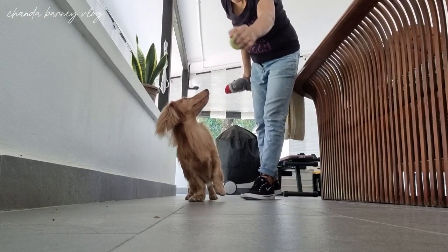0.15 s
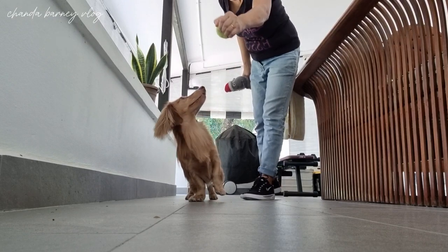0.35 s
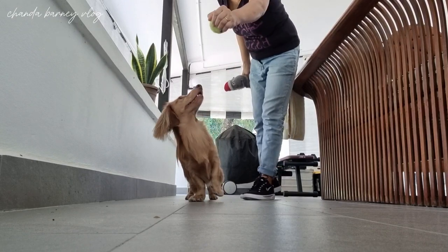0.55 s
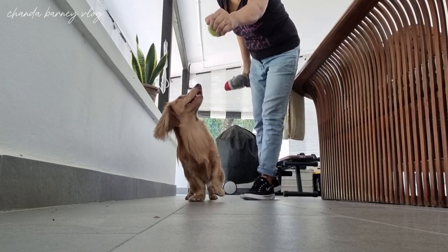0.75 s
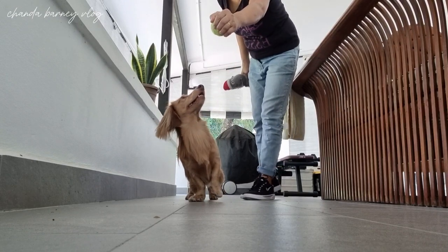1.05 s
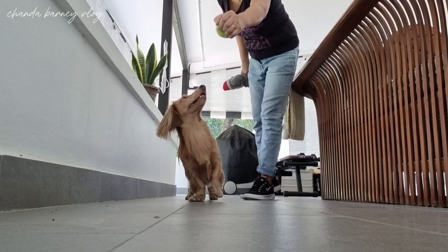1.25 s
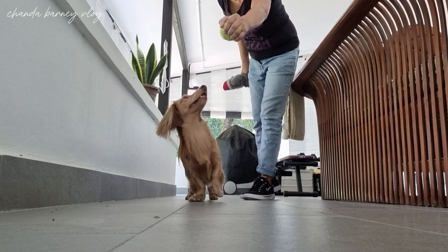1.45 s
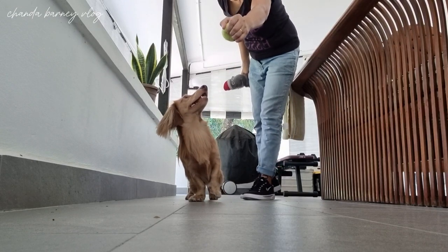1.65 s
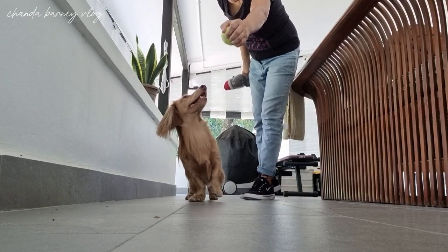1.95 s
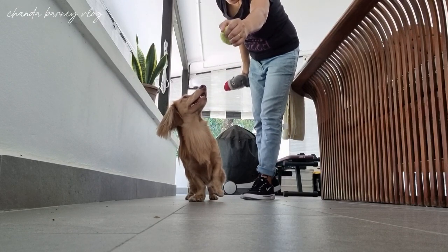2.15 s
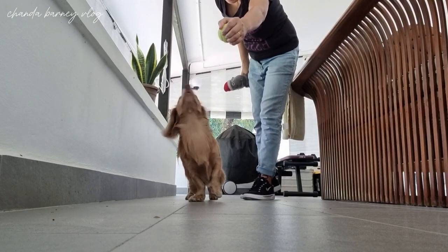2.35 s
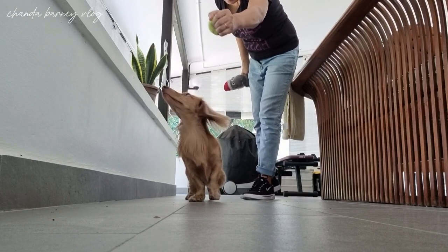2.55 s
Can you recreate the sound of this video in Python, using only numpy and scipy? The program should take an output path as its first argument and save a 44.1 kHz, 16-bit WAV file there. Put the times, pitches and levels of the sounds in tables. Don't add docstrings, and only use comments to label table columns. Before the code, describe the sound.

A squeaky rubber ball gives six short, bright, reedy squeaks at about 0.2, 0.65, 1.05, 1.45, 1.95 and 2.4 seconds. Each starts as a thin falling whistle, locks into a nasal buzz, bends up and drops; the first bends highest, the fourth is nearly flat. Faint air hisses back between squeezes, clearest near 1.75. Hard porch walls ring briefly over very quiet traffic rumble and motor hum.

```python
import sys
import numpy as np
from scipy import signal
from scipy.fft import rfft, irfft
from scipy.io import wavfile
from scipy.ndimage import uniform_filter1d, map_coordinates

SR = 44100
rng = np.random.default_rng(int(sys.argv[2]) if len(sys.argv) > 2 else 0)


def dump_mix(stems):
    frames = np.atleast_2d(stems).T
    limited = np.clip(frames, -1, 1)
    pcm = np.round(limited * 32767).astype(np.int16)
    wavfile.write(sys.argv[1], SR, pcm)


def convert_level_to_amplitude(level_db):
    exponent = np.asarray(level_db, float) / 20
    return 10 ** exponent


N = 119070
BIN_HZ = np.arange(N // 2 + 1) * SR / N


def shape(points, hz):
    p = np.array(points)
    return np.interp(np.log(np.maximum(hz, 1)), np.log(p[:, 0]), p[:, 1])


def resonance(f, hz, width_hz):
    return 1 / (1 + (2 * (f - hz) / width_hz) ** 2)


def noise(gain):
    x = irfft(rfft(rng.standard_normal(N)) * gain(BIN_HZ), N)
    return x / x.std()


def walk(rate_hz):
    return noise(lambda f: 1 / (1 + (f / rate_hz) ** 4))


# t/s, f/Hz
REED_PITCH = [
    [(.235, 1402), (.261, 1485), (.269, 1555), (.283, 1879), (.289, 1924), (.297, 1752), (.303, 1469),
     (.313, 1414), (.321, 1350)],
    [(.649, 1412), (.664, 1478), (.678, 1534), (.686, 1548), (.698, 1460), (.71, 1372), (.722, 1290)],
    [(1.0672, 1410), (1.085, 1450), (1.1, 1475), (1.115, 1445), (1.125, 1385), (1.136, 1290)],
    [(1.472, 1407), (1.496, 1433), (1.514, 1412), (1.522, 1375), (1.535, 1290)],
    [(1.958, 1406), (1.974, 1451), (1.99, 1540), (2.0, 1605), (2.012, 1455), (2.024, 1390), (2.036, 1320)],
    [(2.39, 1409), (2.405, 1468), (2.42, 1511), (2.43, 1455), (2.44, 1368), (2.455, 1290)],
]
REED_LEVEL_DB = [
    [-37.5, -34, -29.5, -30, -30, -32, -42, -36, -44.5],
    [-37, -37.5, -31.5, -32.5, -41, -35, -70],
    [-37.5, -38, -34.5, -36.5, -35.5, -55.5],
    [-37.5, -38.5, -35, -38.5, -54],
    [-37, -37.5, -31, -30, -39.5, -36, -51],
    [-36, -38, -33, -35.5, -36.5, -59],
]
# L-R level/dB, its slope/(dB/octave), treble tilt/(dB/octave),
# partial 1 level/dB, partial 2 level/dB
GRIP = [(2.1, -1.5, .1, 1.1, -0.8), (1.2, -1.5, -0.95, -3.3, -1.9), (0.93, 1.7, -1.27, -1.5, -3.5),
        (-3, 0.5, 0.83, 2, -2), (6.5, -1.7, 0.39, 0, -0.8), (3.5, -1.4, -0.22, -1, -1.8)]
# t re lock/s, f/Hz, level re lock/dB, overtone share/(0-1)
WHISTLE = [
    (-.024, 2800, -46, .01),
    (-.011, 2950, -27, .01),
    (-.007, 2650, -13, .02),
    (-.0055, 2400, -11, .1),
    (-.0045, 2020, 1.5, .5),
    (-.0015, 1780, 1.5, .55),
]
WHISTLE_DB = [9, -1.5, -3, -3, -1.5, -6]
FINGERS_DB = [-2.5, 2, 2.5, -2, -1.4, 0]
BEND_DB = [3, 13, -4.5]
# f/Hz, level/dB
TUBE = [(1300, -6), (3100, 4.3), (4400, 1), (6000, -3), (8200, -20), (10000, -11.5), (11500, -0.5),
        (16000, -10.5)]
REST_HZ, BEND_TILT_DB = 1504, 1.5
LEFT_LAG_S = -.00027
JITTER, SHIMMER_DB = .001, .5
BREATH_DB = -34
PUFF_DB, PUFF_RISE_S, PUFF_FALL_S = -19, .008, .0032


def squeaks():
    out, feed = np.zeros((2, N)), np.zeros(N)
    jitter, shimmer_db = 1 + JITTER * walk(250), SHIMMER_DB * walk(220)
    air = noise(lambda f: convert_level_to_amplitude(0.35 * shape(TUBE, f)) * (f > 1100))
    k = np.arange(1, 13)[:, None]
    start_s, start_hz, start_db, start_share = np.array(WHISTLE).T
    squeezes = zip(REED_PITCH, REED_LEVEL_DB, GRIP, WHISTLE_DB, FINGERS_DB)
    for pitch, level_db, grip, whistle_db, fingers_db in squeezes:
        pan_db, pan_slope_db, tilt_db, first_db, second_db = grip
        reed_s, reed_hz = np.array(pitch).T
        lock_s, lock_db = reed_s[0], level_db[0]
        at = np.r_[lock_s + start_s, reed_s]
        i = np.arange(int(at[0] * SR), int(at[-1] * SR))
        t = i / SR

        hz = np.interp(t, at, np.r_[start_hz, reed_hz])
        hz = uniform_filter1d(hz, size=24) * jitter[i]
        lead_db = lock_db + start_db + whistle_db * (start_share < .015)
        db = np.interp(t, at, np.r_[lead_db, level_db]) + shimmer_db[i]
        share = np.interp(t, at[:len(start_s) + 1], np.r_[start_share, 1])
        share = np.clip(share, 0, 1) ** np.minimum(k - 1, 4)

        octave = np.log2(k * hz / 4000)
        bend = np.log2(hz / REST_HZ) * (t > lock_s)
        tilt = tilt_db + BEND_TILT_DB * bend
        low_db = first_db * (k == 1) + second_db * (k == 2)
        gain = convert_level_to_amplitude(db + shape(TUBE, k * hz) + tilt * octave + low_db)
        gain[:3] *= convert_level_to_amplitude(np.outer(BEND_DB, bend))
        gain[3:5] *= convert_level_to_amplitude(fingers_db)
        phase = k * 2 * np.pi * np.cumsum(hz) / SR + np.pi * k ** 2 / 7
        parts = gain * share * (k * hz < 17000) * np.cos(phase)

        late = t - lock_s
        puff = convert_level_to_amplitude(lock_db + PUFF_DB) * np.exp(np.where(late < 0, late / PUFF_RISE_S, -late / PUFF_FALL_S))
        breath = (convert_level_to_amplitude(db + BREATH_DB) + puff) * air[i]
        feed[i] += parts.sum(0) + breath
        for c, side in enumerate((1, -1)):
            pan = convert_level_to_amplitude(side * (pan_db + pan_slope_db * octave) / 2)
            x = np.pad((parts * pan).sum(0) + breath, 40)
            j = np.arange(len(x))
            delayed = map_coordinates(x, [j - side * LEFT_LAG_S / 2 * SR], order=5)
            out[c, j + i[0] - 40] += delayed
    return out, feed


# t/s, length/s, hiss level/dB, whistle level/dB
REFILLS = [
    (.003, .13, -72, -72),
    (.5, .1, -95, -80),
    (0.901, 0.13, -92, -97),
    (1.33, 0.24, -88, -93),
    (1.718, 0.1, -72, -104.5),
    (2.208, .1, -87, -107),
    (2.62, .1, -95, -92),
]
REFILL_HZ, REFILL_WIDTH_HZ = 4100, 90


def refills():
    t, out = np.arange(N) / SR, np.zeros(N)
    hiss = noise(lambda f: convert_level_to_amplitude(.5 * shape(TUBE, f)) * (f > 1500))
    whistle = noise(lambda f: resonance(f, REFILL_HZ, REFILL_WIDTH_HZ))
    for start_s, length_s, hiss_db, whistle_db in REFILLS:
        flow = np.sin(np.pi * np.clip((t - start_s) / length_s, 0, 1)) ** 2
        out += flow * (convert_level_to_amplitude(hiss_db) * hiss + convert_level_to_amplitude(whistle_db) * whistle)
    return out


# left delay/ms, right delay/ms, level/dB
ECHOES = [
    (.6, .45, -5),
    (2.9, 4.1, -11),
    (6.3, 5.2, -14),
    (27.7, 31.2, -12),
]
# f/Hz, t60/s
LATE_T60 = [
    (1400, 0.66),
    (3000, 0.62),
    (6000, 0.67),
    (12000, 0.41),
]
EARLY_DB, EARLY_T60_S, LATE_DB, GAP_S = -7, 0.23, -12, 0.015
WALL_HZ = 7300


def porch(feed):
    t, out = np.arange(SR) / SR, []
    for c in range(2):
        late = 0
        for hz, t60_s in LATE_T60:
            band = noise(lambda f: np.exp(-np.log2(np.maximum(f, 1) / hz) ** 2 / 0.73))[:SR]
            late = late + band * np.sqrt(hz) * convert_level_to_amplitude(-60 * t / t60_s)
        early = noise(lambda f: (f > 900) / np.sqrt(1 + (f / WALL_HZ) ** 2))[:SR]
        early = early * convert_level_to_amplitude(-60 * t / EARLY_T60_S)
        h = convert_level_to_amplitude(LATE_DB) * late / np.linalg.norm(late) + convert_level_to_amplitude(EARLY_DB) * early / np.linalg.norm(early)
        h *= np.clip(t / GAP_S, 0, 1) ** 2
        for *delay_ms, db in ECHOES:
            h[:2048] += convert_level_to_amplitude(db) * np.sinc(np.arange(2048) - delay_ms[c] * SR / 1000)
        out.append(signal.fftconvolve(feed, h)[:N])
    return np.array(out)


# f/Hz, level/dB
TOWN = [(25, -7.5), (60, -2.5), (161, -9.5), (450, -15), (753, -19), (1600, -33.5), (3000, -39),
        (16000, -50)]
# f/Hz, width/Hz, level/dB
HUM = [
    (72.5, 24, -65),
    (119.9, 10, -64),
    (153.56, 3.1, -63),
    (196.7, 2.7, -73.5),
]
TOWN_DB, ALIKE_HZ = -60, 450


def town():
    mid = noise(lambda f: convert_level_to_amplitude(shape(TOWN, f)))
    side = noise(lambda f: convert_level_to_amplitude(shape(TOWN, f)))
    side_power = 0.073 + 0.77 / (1 + (ALIKE_HZ / np.maximum(BIN_HZ, 1)) ** 2)
    side = irfft(rfft(side) * np.sqrt(side_power), N)
    hum = sum(convert_level_to_amplitude(db) * noise(lambda f: resonance(f, hz, width_hz)) for hz, width_hz, db in HUM)
    sign = np.array([[1], [-1]])
    swell = convert_level_to_amplitude(TOWN_DB + 0.2 * walk(4.5))
    return swell * (mid + sign * side) * convert_level_to_amplitude(0.44 * sign) + hum * convert_level_to_amplitude(0.78 * sign)


def scene():
    direct, feed = squeaks()
    air = refills()
    return direct + air + porch(feed + air) + town()


def band_limit(x):
    return signal.sosfilt(signal.butter(12, 16100, fs=SR, output="sos"), x)


def record(dry):
    dip = 1 - .85 * resonance(BIN_HZ, 8200, 450)
    top = np.clip((15950 - BIN_HZ) / 120, 0, 1)
    mix = irfft(rfft(dry) * dip * top, N)
    return band_limit(mix)


dry = scene()
out = record(dry)
dump_mix(out)
```